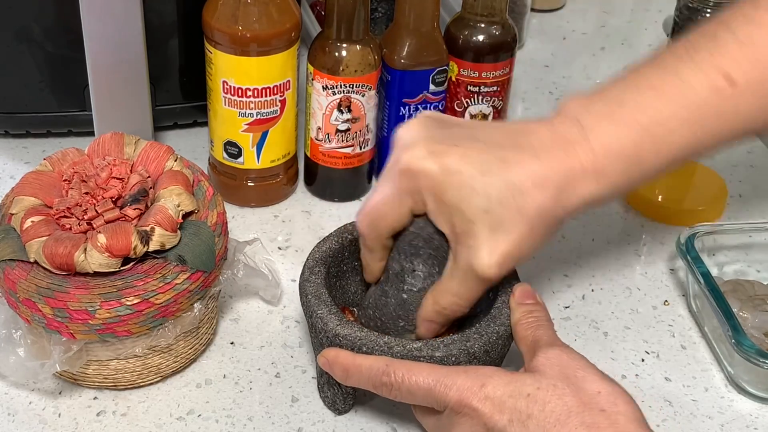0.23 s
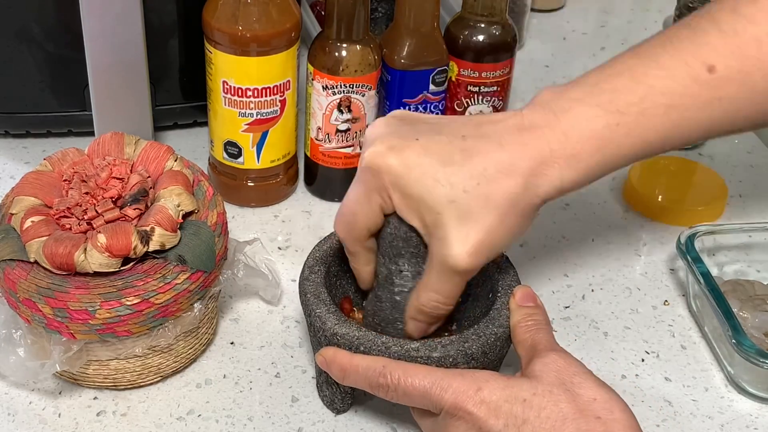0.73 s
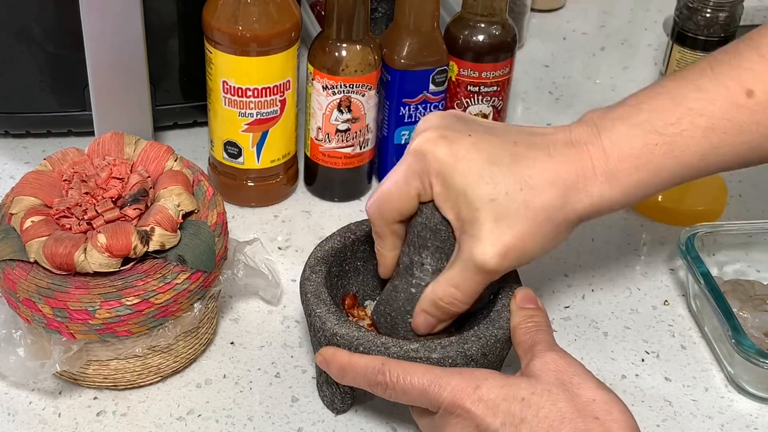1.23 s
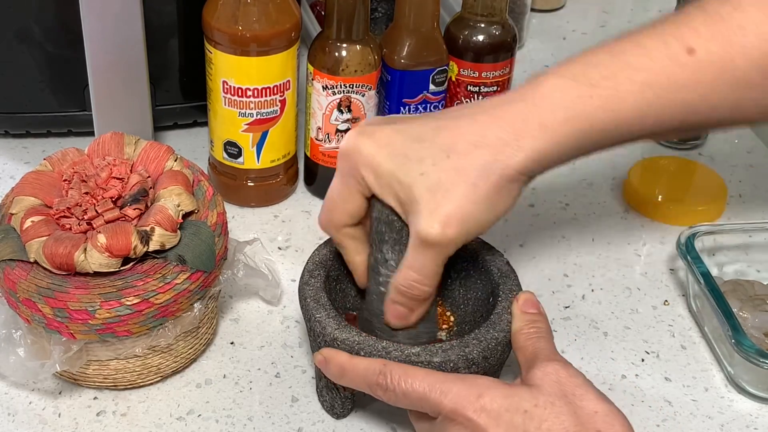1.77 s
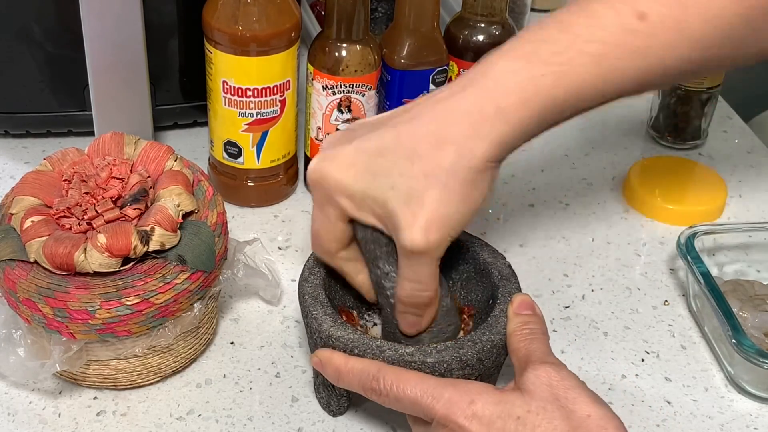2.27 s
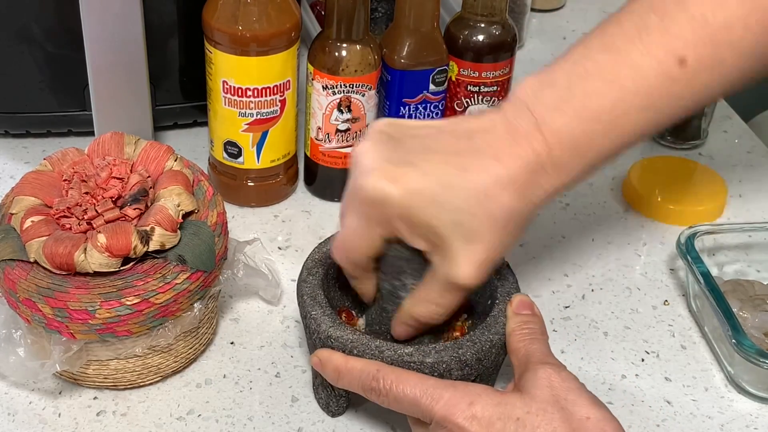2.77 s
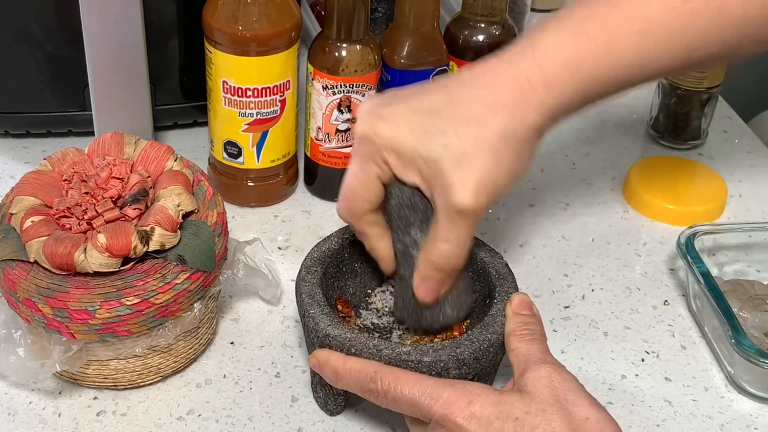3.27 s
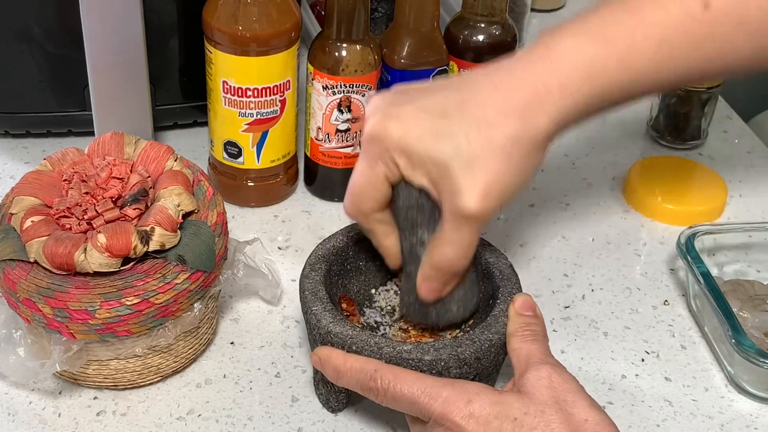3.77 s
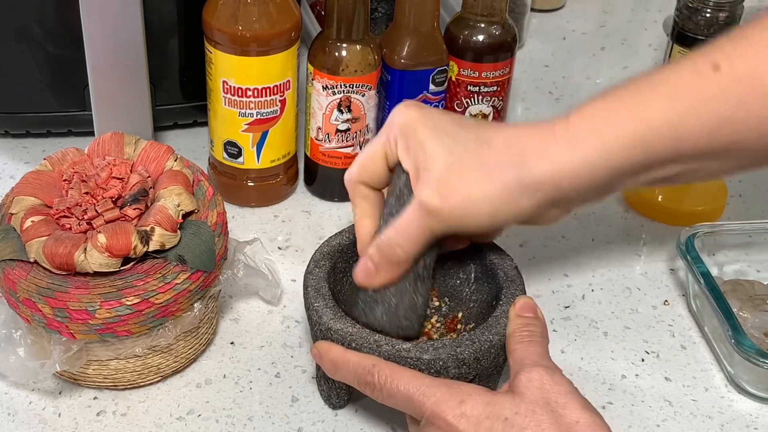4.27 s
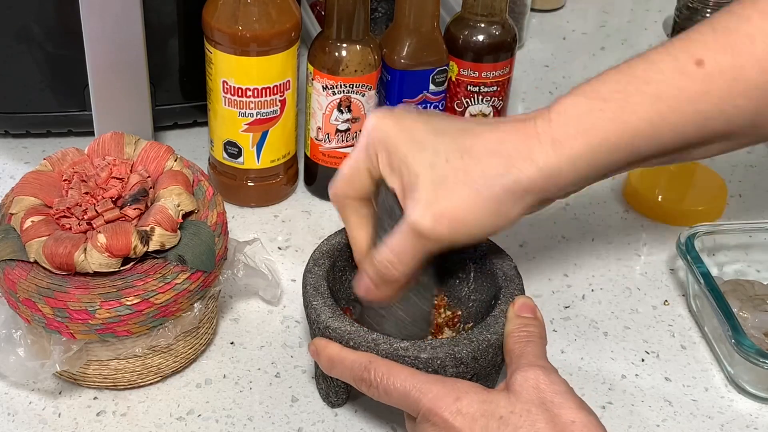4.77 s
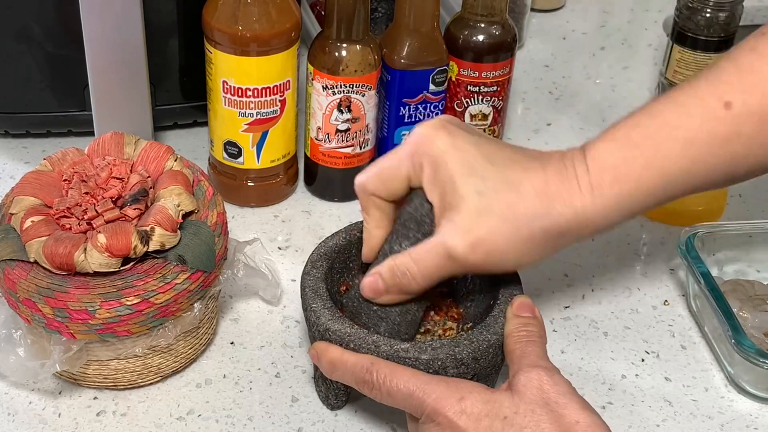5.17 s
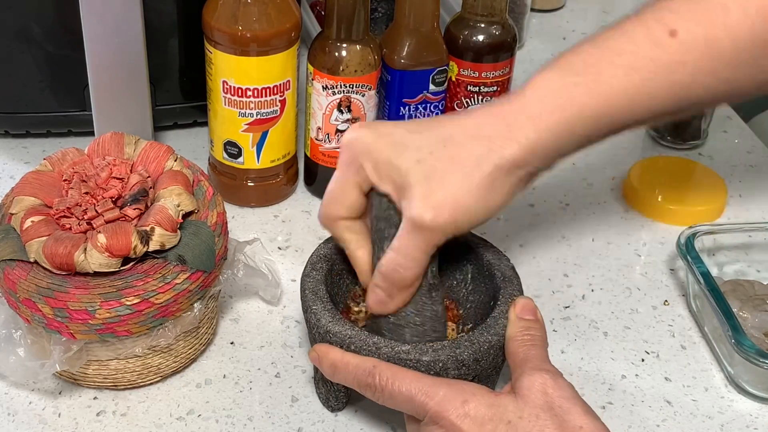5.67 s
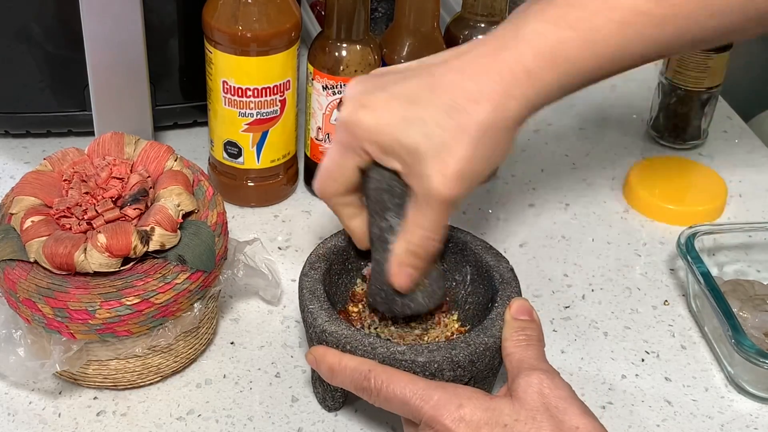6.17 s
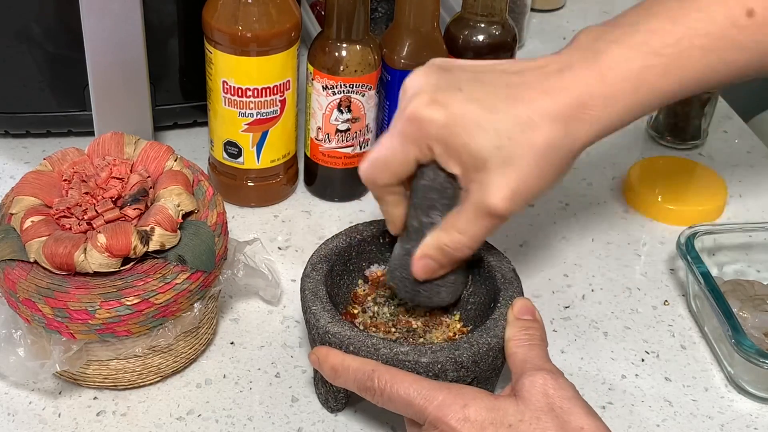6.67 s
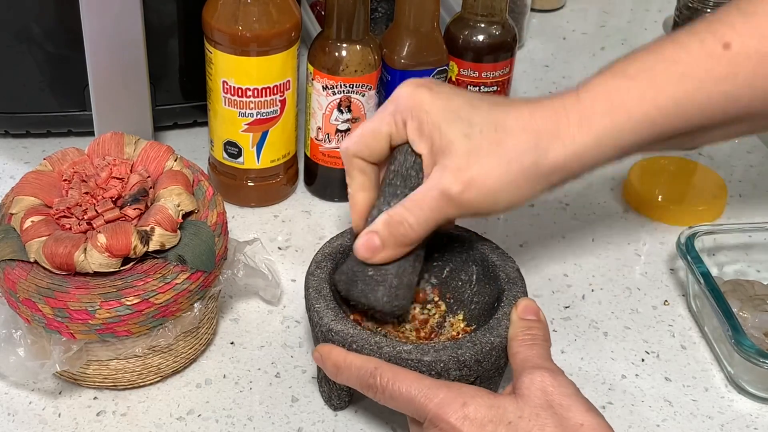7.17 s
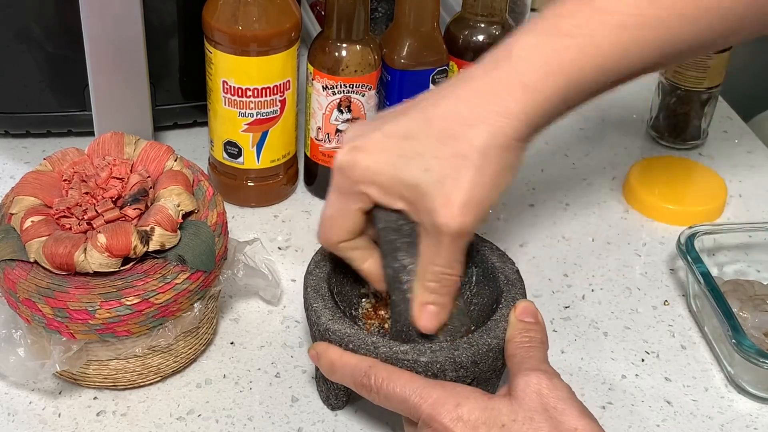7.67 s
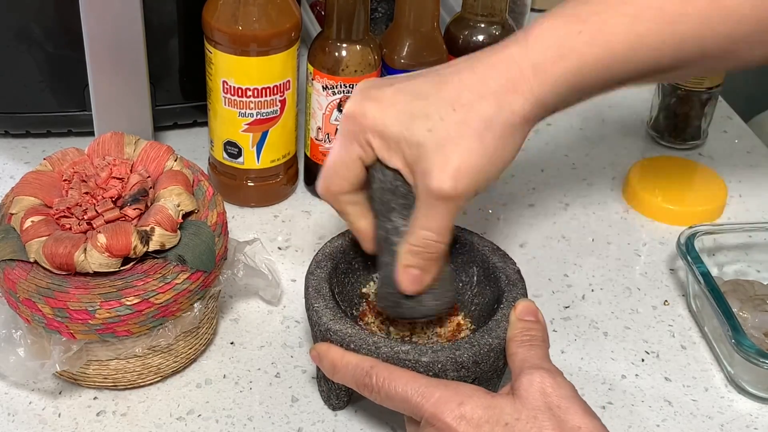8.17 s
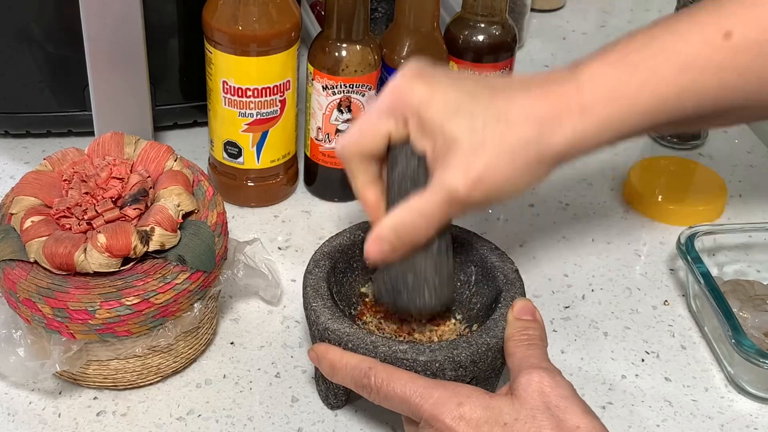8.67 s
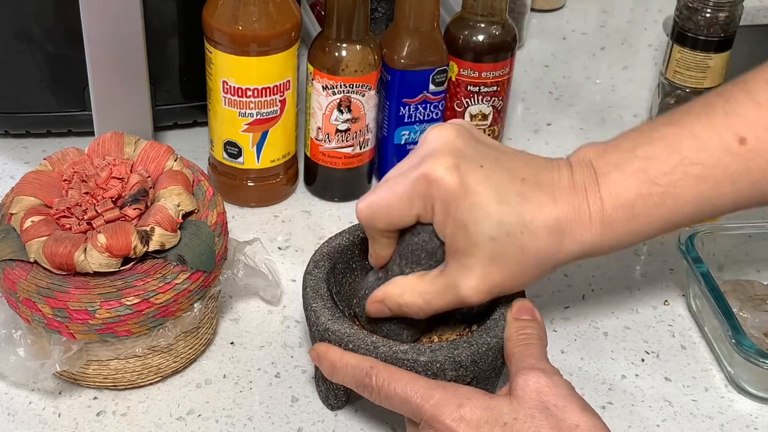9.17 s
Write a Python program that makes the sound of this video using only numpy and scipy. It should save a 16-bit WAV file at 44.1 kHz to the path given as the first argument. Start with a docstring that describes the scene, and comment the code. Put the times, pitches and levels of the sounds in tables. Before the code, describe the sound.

A stone pestle grinds dry chile, seeds and coarse salt in a stone mortar on a kitchen counter, heard close in stereo. From 0 to 3 s the strokes are fairly soft, gritty rubs of a tenth to a third of a second with dull taps, a firmer crunching thud at 1.1 s. Around 3.2 s quick knocks gather, and at 3.7 to 3.85 s two hard stony clacks land in a loud scrape, followed by lighter clacks near 4.2 s. Uneven grinding and moderate taps fill 4.4 to 6.6 s, with a faint hiss near 5.9 s. Strong knocks and rasping return at 6.8, 7.2 and 8.25 s, quieter rubs between. A crunchy blow at 8.9 s leads into last scrapes by 9.3 s. Fine crackle, low counter rumble, a short room tail and faint motor hum accompany everything.

```python
"""Kitchen counter: a stone pestle grinds and pounds dry spices and salt in a stone mortar.
Rubbing and knocks (noise swarms) ring the stone's modes and a broad crunch; coloured clicks and noise
bursts make grit crackle and snaps. Two soft hisses pass; force noise rumbles in the counter's low modes.
A noise tail gives the room, filtered noise the motor hum and air. Two spaced ports hear the bowl differently."""
import sys
import numpy as np
from scipy import signal
from scipy.fft import rfft, irfft, next_fast_len
from scipy.io import wavfile

SR = 44100
rng = np.random.default_rng(int(sys.argv[2]) if len(sys.argv) > 2 else 0)


def to_wav(sig):
    """Store sig (one row per channel, or 1-D mono) as 16-bit WAV at the path in sys.argv[1].

    Samples outside -1..1 are clipped; the rate is SR.
    """
    pcm = np.clip(np.atleast_2d(sig), -1, 1) * 32767
    pcm = np.round(pcm).astype(np.int16)
    wavfile.write(sys.argv[1], SR, pcm.T)  # frames by channels


N = 414967
OPPOSITE = [[1], [-1]]   # left and right port in antiphase


def amp(db):
    """dB to gain."""
    return 10 ** (np.asarray(db) / 20)


def rms_one(x):
    """Scaled to rms 1."""
    return x / np.sqrt(np.mean(x ** 2) + 1e-20)


def at_hz(points, hz):
    """A table read on a log-frequency axis."""
    f_hz, value = np.array(points).T
    return np.interp(np.log(hz), np.log(f_hz), value)


def colour(x, spectrum):
    """Zero-phase filter from a table of f/Hz, level/dB."""
    size = next_fast_len(N)
    hz = np.maximum(np.arange(size // 2 + 1) * SR / size, 1)
    return irfft(rfft(x, size) * amp(at_hz(spectrum, hz)), size)[..., :N]


def butter(x, order, edge_hz, kind):
    """Butterworth filter."""
    return signal.sosfilt(signal.butter(order, edge_hz, kind, fs=SR, output="sos"), x)


def drift(hz):
    """Slow random wander of rms 1: noise through a two-pole low-pass."""
    r = np.exp(-2 * np.pi * hz / SR)
    wander = signal.lfilter([1], [1, -2 * r, r * r], rng.standard_normal(N + SR))
    return rms_one(wander[SR:])   # filter settled


def ring(x, hz, t60_s):
    """Resonator: a unit click sets off a decaying sine of height 1."""
    r, w = 10 ** (-3 / (t60_s * SR)), 2 * np.pi * hz / SR
    return signal.lfilter([0, np.sin(w)], [1, -2 * r * np.cos(w), r * r], x + 1e-18)


def soften(x, hz):
    """A contact of finite length: one-pole low-pass."""
    r = np.exp(-2 * np.pi * hz / SR)
    return signal.lfilter([1 - r], [1, -r], x)


def grains(per_s, spread_db):
    """Random clicks of very uneven size; rms 1."""
    sizes = amp(spread_db * np.minimum(rng.exponential(1, N), 5)) * rng.choice([-1, 1], N)
    return rms_one(sizes * (rng.random(N) < per_s / SR))


def strokes():
    """Each stroke rises, fades or swells while it lasts, and lets go; yields push, rubbing, crackle in dB."""
    # grinding strokes: start/s, length/s, push/dB, rubbing/dB, crackle/dB, fade/(dB/s); levels relative
    grinding = [(-0.002, 0.34, -41, -40.5, -49, 15.5), (0.459, 0.089, -47.5, -100, -54.5, -52),
                (0.623, 0.13, -38, -37, -46.5, 59), (0.887, 0.034, -46.5, -52.5, -48, 22),
                (1.011, 0.33, -37, -39, -50.5, 14), (1.475, 0.34, -44, -41, -53, 10),
                (1.667, 0.26, -42.5, -43.5, -47, -16), (1.992, 0.1, -42, -38.5, -54.5, -60),
                (2.162, 0.23, -39, -37, -48.5, -3), (2.476, 0.097, -44, -36, -54.5, -53),
                (2.653, 0.21, -38.5, -33, -46.5, 41), (2.914, 0.055, -39.5, -32.5, -54, -9),
                (3.124, 0.07, -54, -85, -57.5, 27), (3.26, 0.13, -35, -33, -47, 7),
                (3.712, 0.31, -29.5, -27, -42.5, 34.5), (4.158, 0.11, -43, -32, -54, -85),
                (4.353, 0.27, -48, -44.5, -56, 12), (4.479, 0.039, -35, -38, -40.5, 44),
                (4.715, 0.12, -33.5, -38.5, -53, 0), (4.894, 0.11, -38, -38.5, -48.5, -49),
                (5.052, 0.25, -37.5, -40.5, -52.5, -4), (5.338, 0.097, -40, -38.5, -48.5, -4),
                (5.523, 0.054, -36.5, -34, -52, -8), (5.636, 0.27, -34, -31.5, -47.5, 40),
                (5.842, 0.044, -58, -33.5, -52.5, 11), (5.964, 0.076, -36.5, -35.5, -54.5, 18),
                (6.101, 0.02, -59, -39.5, -46, -8), (6.253, 0.25, -42.5, -42.5, -55.5, -22.5),
                (6.625, 0.013, -66, -64, -47.5, 4), (6.76, 0.3, -29.5, -27.5, -44, 46),
                (7.189, 0.074, -39.5, -27.5, -47, 31), (7.337, 0.12, -30.5, -32.5, -45, 24),
                (7.67, 0.035, -40, -53.5, -62.5, 76.5), (7.769, 0.15, -46, -38, -55, -36),
                (8.247, 0.35, -32, -29.5, -46, 62.5), (8.94, 0.18, -40, -31, -46.5, 51),
                (9.237, 0.038, -37.5, -42, -43, -27)]
    # one entry each for push, rubbing, crackle; the counter answers late and slowly, the grit at once
    lag_s = [0.03, 0, 0]   # delay [s]
    rise_db_per_s = [394.5, 900.5, 1189.5]   # onset slope [dB/s]
    release_db_per_s = [118, 237, 208.5]   # release slope [dB/s]
    resting_db = [-54.5, -69.5, -82.5]   # hand and pestle at rest [dB, relative]
    start, length, *levels, fade = np.transpose(grinding)[:, :, None]
    t = np.arange(0, N + 50, 50) / SR
    for db, lag, rise, release, rest in zip(levels, lag_s, rise_db_per_s, release_db_per_s, resting_db):
        since = t - start - lag
        shape = db - fade * np.clip(since, 0, length)
        shape = shape - rise * np.maximum(-since, 0) - release * np.maximum(since - length, 0)
        power = np.sum(amp(shape) ** 2, axis=0) + amp(rest) ** 2
        yield np.interp(np.arange(N) / SR, t, 10 * np.log10(power))


def crushing_swarms(crush_s):
    """A knock lands on spice: a short swarm of contacts of energy 1, not one click."""
    swell_share = 0.083   # rise as a share of the crushing time
    crisp_s = 0.0076   # the shorter the crushing against this, the harder stone meets stone at first
    t = np.arange(SR // 4) / SR
    shape = (len(crush_s), len(t))
    swarms = rng.standard_normal(shape) * amp(3.6 * rng.standard_normal(shape))
    age = t / np.clip(crush_s, .0005, .05)[:, None]
    swarms = swarms * np.exp(-age) * np.minimum(age / swell_share, 1)
    # stone meets stone first
    swarms[:, 0] = 0.54 * crisp_s / crush_s * np.sqrt(np.sum(swarms ** 2, axis=1))
    return swarms / np.sqrt(np.sum(swarms ** 2, axis=1, keepdims=True))


def knocks():
    """Pestle blows: returns their force as a function of pitch, and the pitches of the struck spots."""
    # pestle on bowl: time/s, level/dB (relative), weight/dB, crushing time/s, struck-spot pitch/Hz
    pestle_blows = [(0.121, -20, 0, 0.069, 616), (0.637, -35.5, 14.5, 0.025, 1270),
                    (1.122, -14.5, 12, 0.0063, 530), (1.69, -30, 2, 0.0064, 540),
                    (1.885, -27, 0, 0.012, 1090), (2.093, -23, 2.5, 0.0076, 1020),
                    (3.199, -25.5, -2, 0.0046, 1205), (3.221, -22.5, 10, 0.0098, 635),
                    (3.257, -18, 6, 0.014, 1148), (3.317, -10.5, 5.5, 0.0038, 1676),
                    (3.708, 3.5, -1.5, 0.0085, 1210), (3.842, 1.5, -0.5, 0.0055, 1680),
                    (4.163, -9.5, 2, 0.011, 1510), (4.221, -7, 1, 0.011, 1160),
                    (4.241, -6.5, -9, 0.0067, 1240), (4.721, -41, 28, 0.0031, 510),
                    (4.776, -20, 11, 0.011, 553), (5.011, -7.5, -25, 0.0065, 1450),
                    (5.167, -12, -19, 0.0031, 1590), (5.423, -13.5, -15, 0.0043, 1570),
                    (5.632, -23, 12.5, 0.0096, 623), (6.268, -26.5, 6.5, 0.004, 1090),
                    (6.368, -14.5, -12, 0.0051, 1647), (6.667, -39, 18.5, 0.0076, 762),
                    (6.739, -14.5, -7.5, 0.022, 650), (6.762, -15, 14, 0.0089, 574),
                    (6.81, 4, -5, 0.0089, 1057), (7.188, -3.5, 1.5, 0.014, 1090),
                    (7.411, -36.5, 20.5, 0.011, 592), (7.679, -28, 12, 0.006, 629),
                    (7.846, -21, 10.5, 0.011, 630), (7.88, -43, 9.5, 0.0078, 600),
                    (8.04, -31.5, 7, 0.0069, 1120), (8.25, 3, -7, 0.0068, 1536),
                    (8.462, -34, 14.5, 0.0078, 575), (8.916, -10, 6.5, 0.025, 1160)]
    s, level_db, weight_db, crush_s, spot_hz = np.transpose(pestle_blows)
    # upper modes against middle ones: harder blows are brighter; flat blows on spice also crunch brightly
    bright_db = -9 + .9 * level_db + 0.42 * np.maximum(weight_db, 0)
    at = (s * SR).astype(int)
    swarms = crushing_swarms(crush_s)
    span = swarms.shape[1]

    def blows(hz, extra_db):
        """The swarms in place, weighted for one pitch."""
        high = np.clip(np.log2(hz / 2000) / .5, 0, 1)   # hard contacts reach the upper modes
        low = np.clip(np.log2(950 / hz) / .5, 0, 1)     # heavy flat blows reach the lower ones
        gains = amp(level_db + extra_db + high * bright_db + low * weight_db)
        force = np.zeros(N + span)
        for i, gain, swarm in zip(at, gains, swarms):
            force[i:i + span] += gain * swarm
        return force[:N]

    return blows, spot_hz


def rubbing(rub_db):
    """Lurching rough contact: uneven catches softened by their contact length."""
    lurch = amp(rub_db + 2.94 * drift(hz=13.3))
    catches = grains(per_s=1800, spread_db=4.7)
    return lurch * soften(soften(catches, hz=1720), hz=2900)


def crunch_noise(blows, rasp):
    """Unresolved modes and crushed spice: blows in three bands plus rubbing, coloured."""
    # f/Hz, level/dB (relative, per Hz)
    crunch_spectrum = [(150, -43), (500, -4.5), (1500, -1), (3000, -8.5), (3700, -10), (4200, -12.5),
                       (6000, -26), (10000, -44.5), (16000, -62.5)]
    deep = butter(blows(500, 16.8), 4, 800, "low")
    dull = butter(blows(1400, 15.07), 4, [800, 2100], "band")
    sharp = butter(blows(4000, 20.4), 4, 2100, "high")
    return colour(deep + dull + sharp + amp(-2.0) * rasp, crunch_spectrum)


def stone(rub_db):
    """Rubbing and knocks ring the same modes; each knock strikes every mode with its own strength."""
    # mortar and pestle modes: f/Hz, level/dB (relative), free t60/s
    stone_modes = [(366, -10, .06), (548, -6, .05), (650, -4, .05), (1055, 0, .05), (1150, -2, .035),
                   (1270, -3, .035), (1465, -4, .04), (1550, -3, .045), (1684, -3, .05), (1815, -4, .04),
                   (2020, -11, .04), (2600, -5, .03), (3200, -2, .04), (4090, -1, .08), (4200, -5, .06),
                   (4480, -14, .025), (4805, -18, .06)]
    # answer of each mode to rubbing against a blow: level/dB (relative)
    rubbed_db = [9.5, 6.5, 2, -1.5, 6.5, 1, -23, -8.5, -2.5, -17.5, -1, -18.5, -14, -11, -15, 11, 1.5]
    # shares of the free t60: pestle resting on the stone after a blow, pestle pressed while rubbing
    struck_ring, rubbed_ring = .5, 0.4
    spot_gain_db, spot_octaves = 5, .3   # modes near the struck spot's pitch answer more
    wander_db = 3   # the rubbing finds other modes as the pestle moves round the bowl
    blows, spot_hz = knocks()
    rasp = rubbing(rub_db)
    modes, uneven = 0, 0
    for k, (hz, db, t60_s) in enumerate(stone_modes):
        rubbed = amp(wander_db * drift(hz=4.6) + rubbed_db[k] - 27) * rasp
        spot_db = spot_gain_db * np.exp(-(np.log2(hz / spot_hz) / spot_octaves) ** 2)
        chance_db = 2 * rng.standard_normal(len(spot_hz))
        struck = blows(hz, spot_db + chance_db - 12)
        mode = ring(struck, hz, struck_ring * t60_s) + ring(rubbed, hz, rubbed_ring * t60_s)
        mode = amp(db) * mode
        modes = modes + (-1) ** k * mode
        # each mode's lobes favour one port
        uneven = uneven + (-1) ** (k // 2) * mode * min(hz / 500, 1)
    return modes, crunch_noise(blows, rasp), uneven


def grit(crackle_db):
    """Dense tiny fractures under the pestle, in clumps, and single loud snaps that die in a few ms."""
    # seeds and salt breaking: time/s, level/dB (relative)
    breaks = [(0.19, -40), (0.5151, -38.5), (0.638, -35.5), (0.989, -37.5), (1.1201, -25.5),
              (1.7767, -37.5), (3.382, -38), (3.7105, -30), (3.801, -32.5), (3.842, -27.5), (4.719, -44),
              (4.776, -38.5), (5.628, -42), (6.811, -25.5), (8.038, -50.5), (8.2503, -31), (9.05, -42)]
    # grit spectrum: f/Hz, level/dB (relative, per Hz)
    grit_spectrum = [(1500, -29), (3000, -12), (5500, -8.5), (8000, -8), (11000, 2.5), (13500, 0),
                     (14300, -14), (15600, -2), (16300, -50)]
    crackle = amp(crackle_db + 4.4 * drift(hz=36.6)) * grains(per_s=4500, spread_db=2.5)
    s, level_db = np.transpose(breaks)
    starts = np.zeros(N)
    starts[(s * SR).astype(int)] = amp(level_db + 7.5)
    decay_s = 0.0047
    dying = signal.lfilter([1], [1, -np.exp(-1 / (decay_s * SR))], starts)
    return colour(crackle + dying * rng.standard_normal(N), grit_spectrum)


def swishes():
    """Soft hisses: noise in one band that swells and fades."""
    # start/s, length/s, centre f/Hz, width/Hz, level/dB (relative)
    hisses = [(5.832, 0.21, 4920, 1500, -56.5), (7.76, 0.22, 4350, 152, -55)]
    t, out = np.arange(N) / SR, 0
    for start, length, hz, width, db in hisses:
        hiss = rms_one(butter(rng.standard_normal(N), 2, [hz - width / 2, hz + width / 2], "band"))
        swell = np.sin(np.pi * np.clip((t - start) / length, 0, 1))
        out = out + amp(db) * swell * hiss
    return out


def counter(push_db):
    """The lurching force on the bowl shakes the counter's low modes."""
    # counter modes: f/Hz, width/Hz, level/dB (relative)
    counter_modes = [(67, 0.95, 4), (92, 13, 0), (132.8, 16.4, -1.5), (183.2, 243, 5)]
    force = soften(rng.standard_normal(N) * amp(2.5 * drift(hz=14)), hz=428)
    shake = 0
    for hz, width_hz, db in counter_modes:
        t60_s = np.log(1000) / (np.pi * width_hz)
        shake = shake + amp(db) * rms_one(ring(force, hz, t60_s))
    return amp(push_db) * rms_one(shake)


def at_ports(x):
    """Path difference and the shadow of the case turn phase and level of the left port."""
    # left port against right: f/Hz, lead/rad, level/dB
    port_difference = [(0, 0, -2), (1100, -.5, 3), (1700, 0, 0), (4000, 1.9, -3), (5700, 1.5, -5),
                       (6600, 0, 0), (8400, -3.14, 0), (15700, -12.5, 0)]
    size = next_fast_len(N + 500)
    hz = np.arange(size // 2 + 1) * SR / size
    at, lead_rad, db = np.transpose(port_difference)
    half = amp(np.interp(hz, at, db) / 2)   # level split between the ports
    turn = np.exp(1j * np.interp(hz, at, lead_rad))
    left = irfft(rfft(x, size) * half * turn, size)
    right = irfft(rfft(x, size) / half, size)
    return np.array([left, right])[:, :N]


def kitchen(x, alike_hz):
    """Diffuse tail: noise that dies band by band; long waves reach both ports alike."""
    # reverberation: f/Hz, t60/s
    room_t60 = [(150, 0.12), (500, 0.41), (1500, 0.35), (4000, 0.36), (10000, 0.026)]
    t, tail = np.arange(int(.8 * SR)) / SR, 0
    edges_hz = 60 * 2. ** np.arange(9)
    for low, high in zip(edges_hz, edges_hz[1:]):
        hz = np.sqrt(low * high)
        mid, side = butter(rng.standard_normal((2, len(t))), 2, [low, high], "band")
        both = mid + side * OPPOSITE / np.sqrt(1 + (alike_hz / hz) ** 2)
        tail = tail + both * amp(-60 * t / at_hz(room_t60, hz))
    tail = tail * np.minimum(t / 0.00066, 1)
    tail = tail / np.sqrt(np.sum(tail ** 2) / 2)   # mean energy 1 per port
    return signal.fftconvolve(x[None], tail, axes=1)[:, :N]


def air():
    """Motor hum and room air: steady filtered noise, mostly alike in both ports."""
    # f/Hz, level/dB (relative, per Hz)
    air_spectrum = [(30, -25), (90, -25), (127, 15), (157, -36.5), (345, -11.5), (889, -23.5),
                    (16000, -62.5)]
    mid, side = colour(rng.standard_normal((2, N)), air_spectrum)
    return amp(-51) * rms_one(mid + 0.45 * side * OPPOSITE)


def scene():
    """Bowl and counter, direct and through the room, over the hum."""
    room_db, grit_room_db = 1.5, -15.5   # the grit is heard mostly direct, with little room
    modes_room_share = .35   # share of the modes' ringing sent to the room; the crunch goes in full
    push_db, rub_db, crackle_db = strokes()
    modes, crunch, uneven = stone(rub_db)
    spice = grit(crackle_db) + swishes()
    rumble = counter(push_db) * amp([[-1.2], [1.2]])
    to_room = amp(room_db) * (modes_room_share * modes + crunch) + amp(grit_room_db) * spice
    room = kitchen(to_room, alike_hz=402)
    direct = at_ports(modes + crunch + spice) + 0.2 * uneven * OPPOSITE
    return direct + room + rumble + air()


def record(dry):
    """The bass rolls off, peaks are rounded, the top is cut."""
    stopband_hz = 16900
    thin = butter(dry, 4, 56, "high")
    rounded = 2 * np.tanh(thin / 2)
    return signal.sosfilt(signal.cheby2(12, 70, stopband_hz, fs=SR, output="sos"), rounded)


dry = scene()
out = record(dry)
to_wav(out)
```